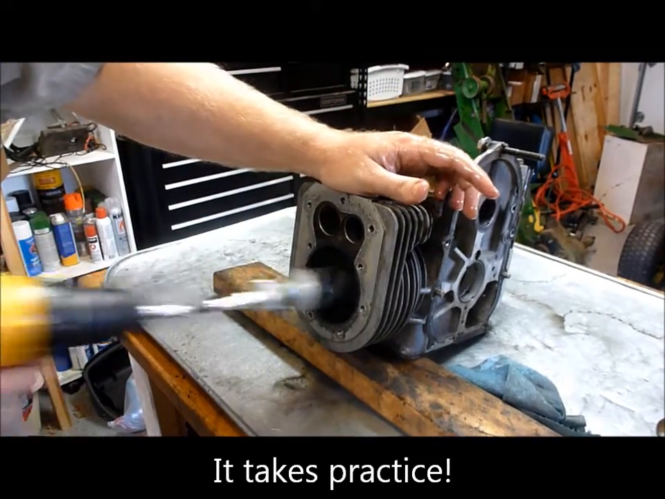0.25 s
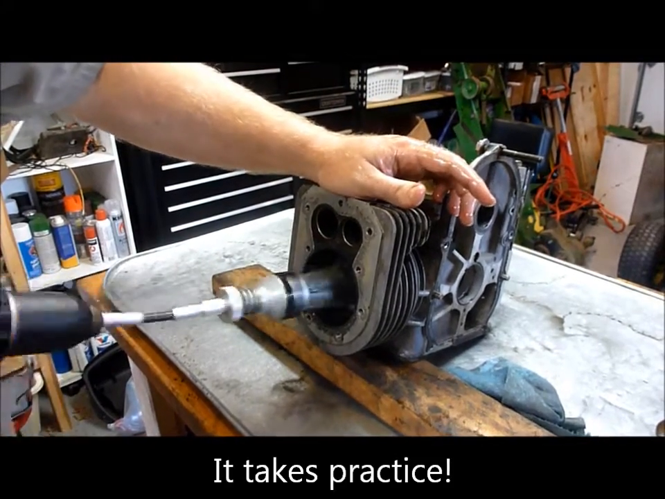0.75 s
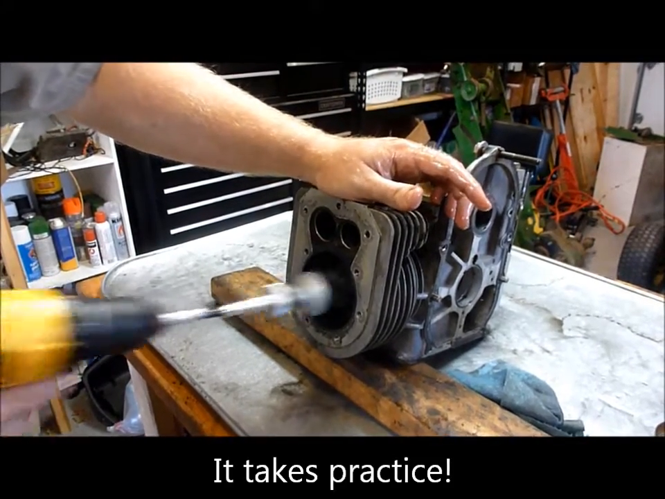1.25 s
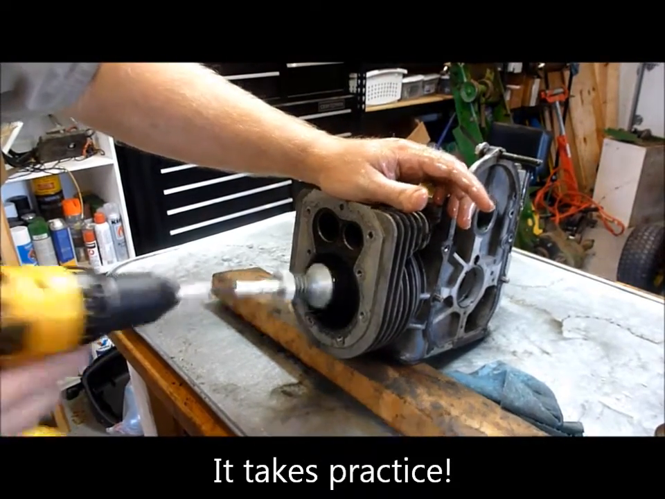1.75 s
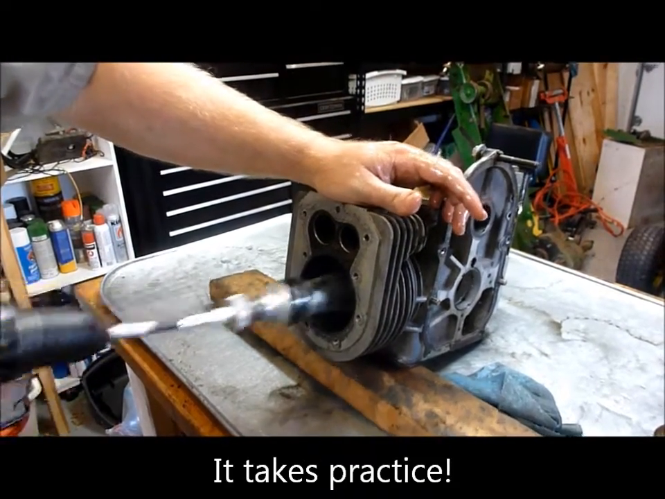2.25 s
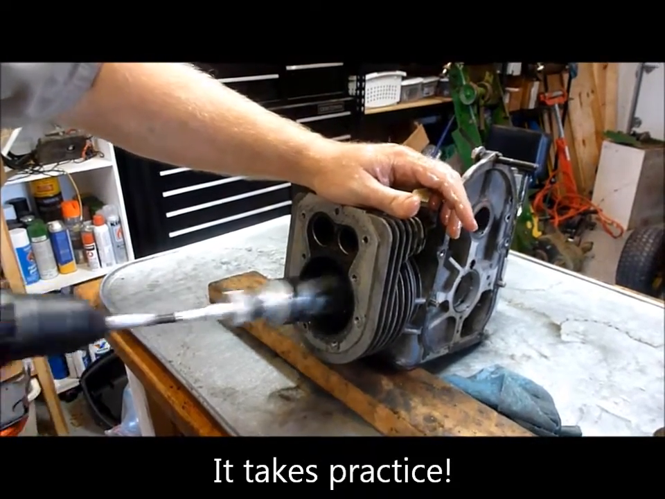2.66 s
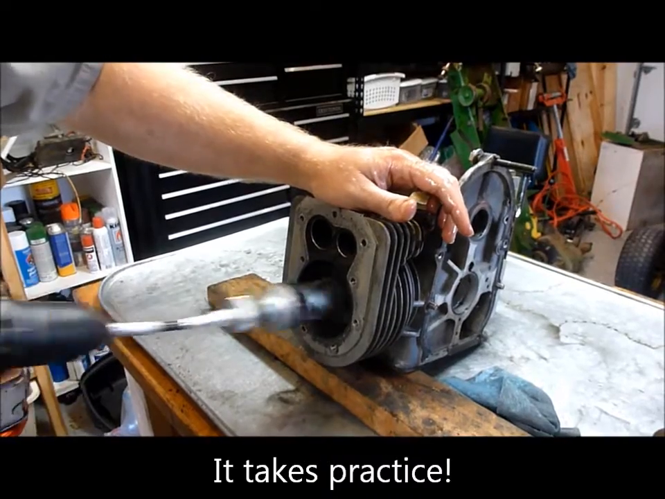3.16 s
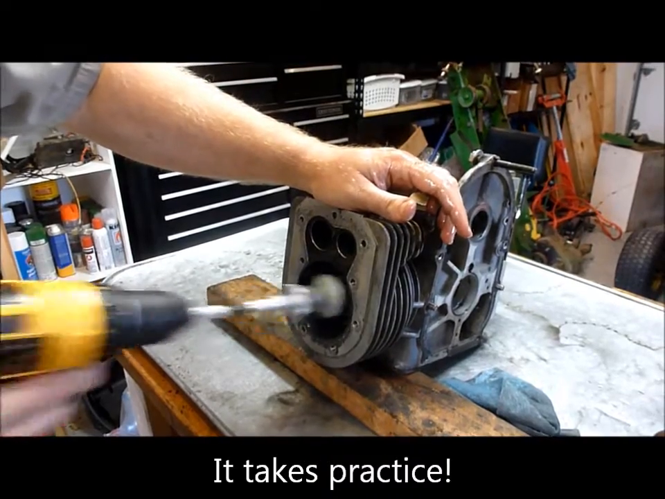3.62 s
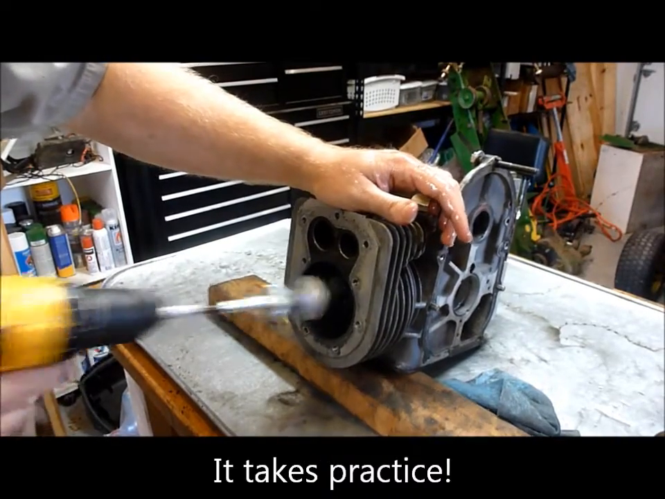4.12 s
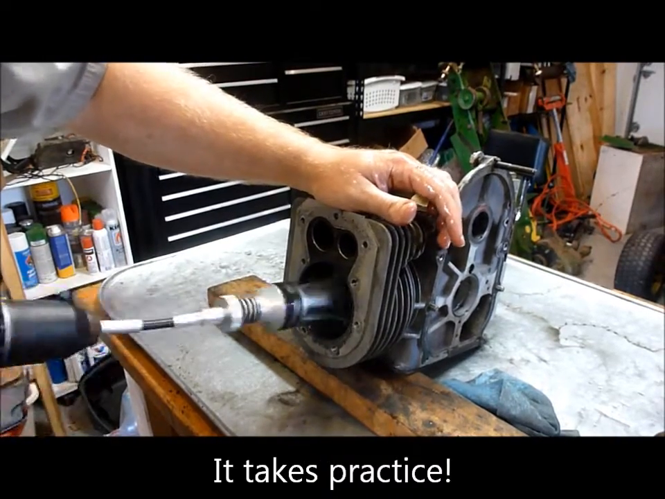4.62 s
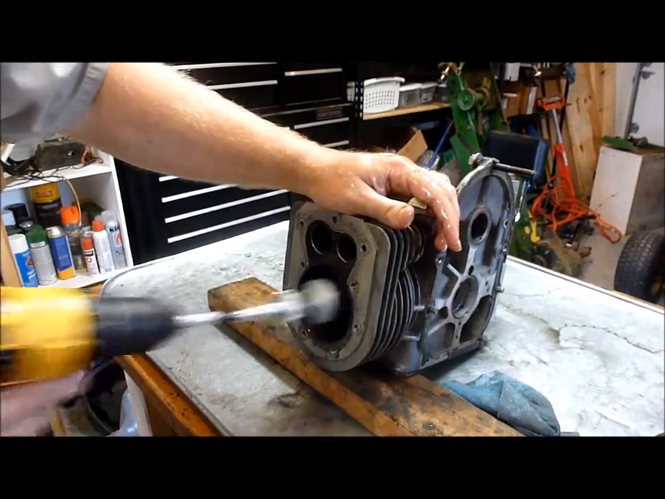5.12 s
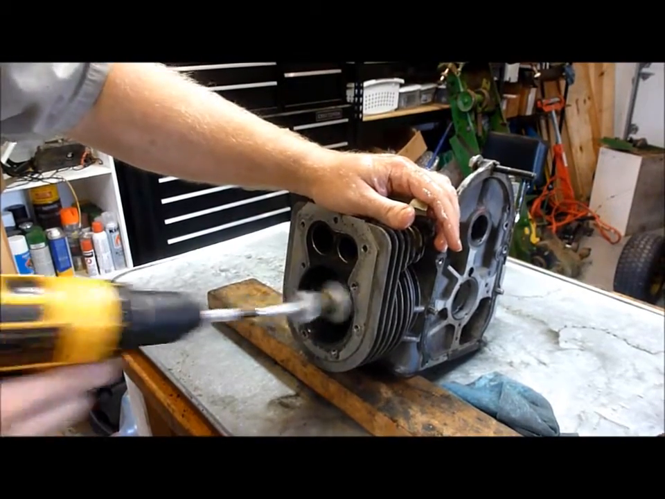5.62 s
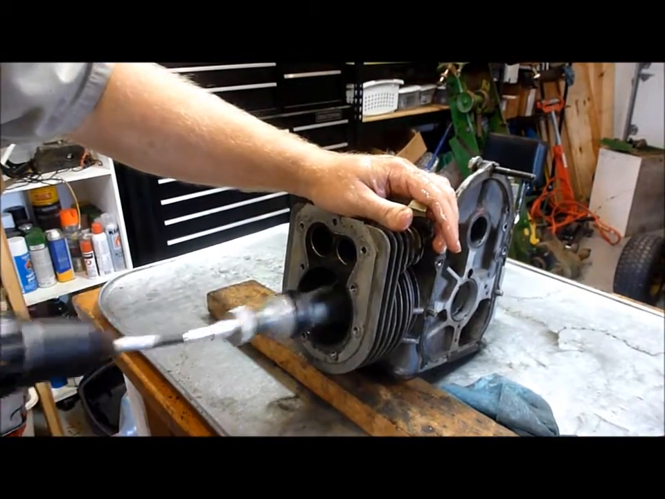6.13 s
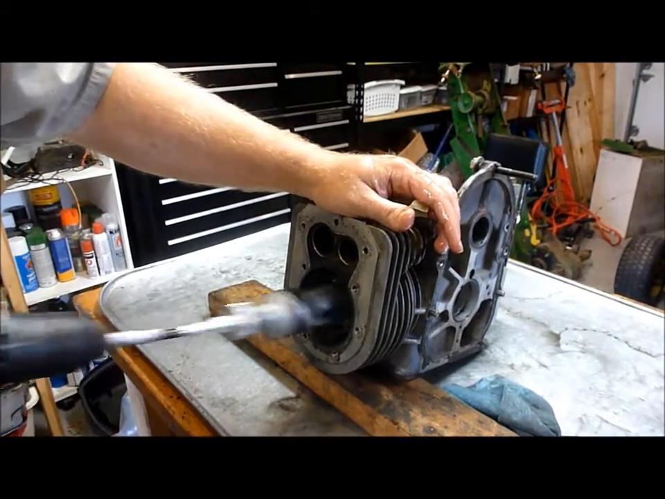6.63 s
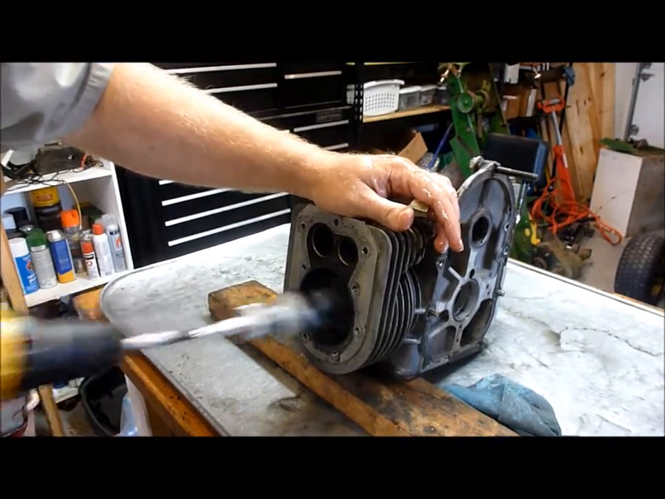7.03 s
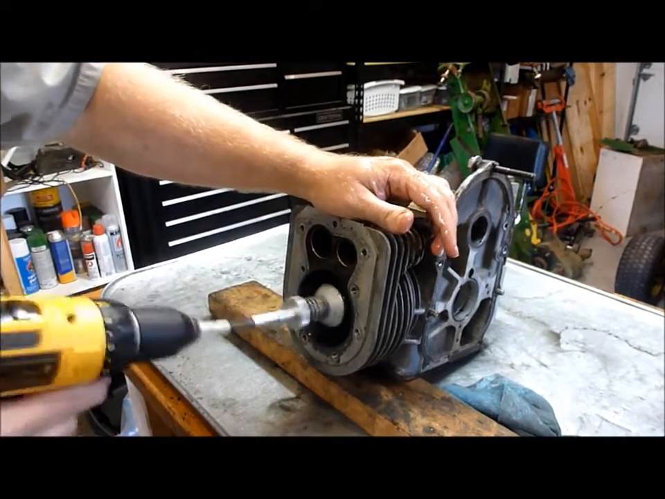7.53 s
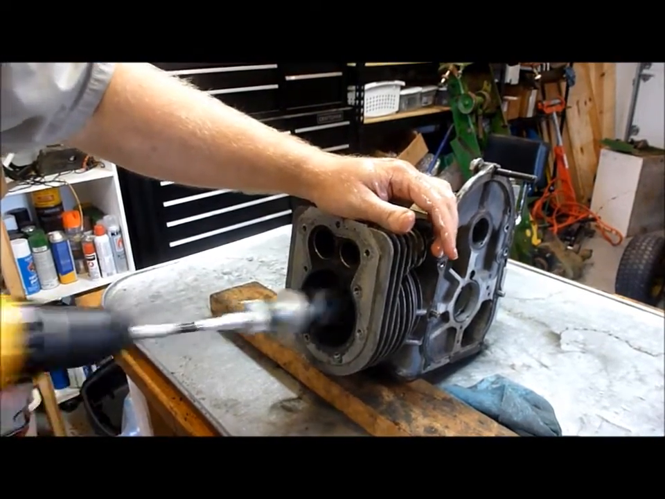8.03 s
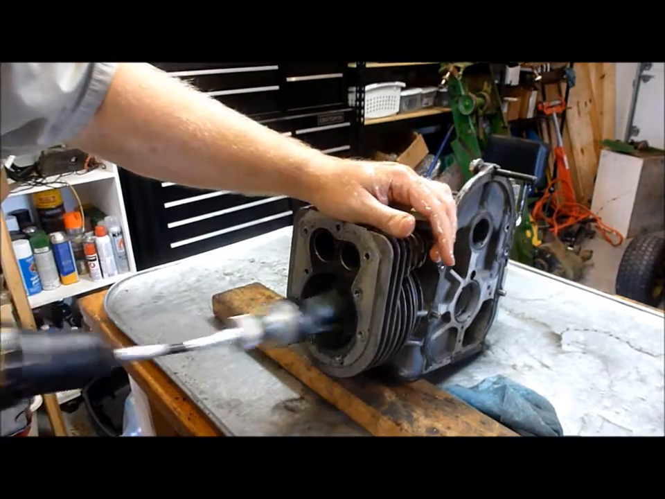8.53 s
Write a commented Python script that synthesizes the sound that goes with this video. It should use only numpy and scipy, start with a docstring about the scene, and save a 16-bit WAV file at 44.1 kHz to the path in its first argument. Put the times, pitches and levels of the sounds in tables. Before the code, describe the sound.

Continuous motor and gear whine with coarse gritty grinding, pulsing in quick regular strokes. Each stroke brings a brighter scrape and small metallic ticks with a short ring, followed by a slight sag in motor pitch and level. Irregular hard snaps, clacking metal and low wooden thuds join from around two seconds and recur to the end. Close microphone, little room, centred and somewhat band-limited.

```python
"""A cordless drill spins a three-stone hone in the bore of a small aluminium engine block, 2.6 strokes a second.
From the start the motor and gears whine as stacked sines, the oiled stones grind as filtered grit impacts,
and the arms and bench ring as damped modes. At each visit to the mouth of the bore the hiss rises and the stones
crack on the rim; shortly after, the motor slows, and whine and grinding mostly dip in level. After a second or so
come harder snaps, then thumps of the block and knocks of the hone (noise bursts, bench modes under the thumps)."""
import sys
import numpy as np
from scipy import signal
from scipy.fft import rfft, irfft
from scipy.io import wavfile
from scipy.ndimage import uniform_filter1d

SR = 44100
rng = np.random.default_rng(int(sys.argv[2]) if len(sys.argv) > 2 else 0)


def int16_out(signal):
    """Quantize to a 16-bit WAV file."""
    q = np.round(np.clip(np.atleast_2d(signal).T, -1, 1) * 32767)
    wavfile.write(sys.argv[1], SR, q.astype(np.int16))


N = 386757
TIME = np.arange(N) / SR

# the drill slowly tires: (time [s], shaft rate between slowings [Hz], whine level between dips [dB],
# grinding level between dips [dB])
DRIVE = [(0, 477.8, -28.5, -28), (0.9, 478.8, -29.5, -28), (1.65, 477.3, -29.5, -27.5),
         (2.05, 475, -30.5, -27), (3.1, 474.6, -30, -29), (4.2, 472.5, -33.5, -29),
         (4.75, 471.5, -32.3, -29), (5.45, 468.3, -33, -30), (6.65, 470, -32.5, -31.5),
         (7.45, 468.2, -34.5, -31), (8.18, 464.9, -32.5, -31), (8.4, 466.5, -33, -31),
         (8.77, 459.8, -30.5, -30)]
# tones of the motor: (multiple of the shaft rate, level [dB])
MOTOR_ORDERS = [(2, -56), (3, -70.5), (4, -40.5), (5, -51.5), (7, -64.5), (9, -44.5), (10, -41.5),
                (13, -52.5), (15, -64)]
# tones of the first gear stage: (multiple of the sun gear's rate against its carrier, level [dB])
GEAR_ORDERS = [(1, -41.5), (2, -41.5), (3, -39), (4, -47.5), (5, -43.5), (6, -38), (7, -46.5), (14, -47.5),
               (17, -63)]
# tones of the second gear stage: (multiple of its tooth rate, level [dB])
MESH_ORDERS = [(1, -47), (2, -37)]
# tones of the slower gears: (multiple of a fifth of the shaft rate, level [dB])
SLOW_ORDERS = [(4, -65), (18, -52.5), (52, -51)]
# spectrum of stone on bore, shared by grind, hiss and cracks: (frequency [Hz], relative level [dB])
STONE_SPECTRUM = [(35, -65), (60, -51), (353, -13.5), (407, -8), (450, -11.5), (764, -11.5), (812, -10),
                  (881, -10), (1270, -6), (1560, -10), (2540, -0.5), (3180, -6), (5280, -3.5), (7320, -30),
                  (7780, -54.5), (10100, -74.5), (17100, -120)]
# tilt added for the grind, then for the hiss: (frequency [Hz], gain [dB])
GRIND_TILT = [(150, 5.5), (340, -5), (700, 3.5), (1250, 1.5), (2100, 2.5), (2700, -2.5), (3300, -6.5), (6000, -16.5)]
HISS_TILT = [(1000, -18.0), (2400, -20), (3200, 1.5), (4600, 2), (5200, 0), (5700, 2.0), (7000, 5.5)]
# modes of the hone's arms and the finned block: (frequency [Hz], relative level [dB], t60 [s])
ARM_MODES = [(1673, -6.5, 0.094), (1981, -4, .15), (2048, -5.5, 0.071), (2435, -9, 0.14), (2797, 3.5, 0.15),
             (2831, 2, 0.11), (3340, -10.5, 0.052), (3620, -6.5, 0.24), (3670, -7, 0.39), (3782, 2.5, 0.2),
             (3880, 3, .22), (3910, -6, 0.11), (4140, -8.5, 0.18), (4360, -9, 0.1), (4586, -3.5, .25),
             (4730, -8, 0.086), (4880, -8.5, .12), (5080, -6, .12), (5430, -5, 0.28), (5650, -8, 0.18),
             (6160, -13, .15), (6430, -13, 0.18), (6560, -13, 0.22), (6840, -16.5, .1)]
# modes of the boards and bench top: (frequency [Hz], relative level [dB], t60 [s])
BENCH_MODES = [(82, -6, .12), (115, -6, .12), (140, 1, .2), (161, 0, .18), (198, 1, .26), (212, 0, .25),
               (236, -2, .18), (268, -3, .12), (318, -6, .1)]
# the hone is drawn back to the mouth of the bore: (arrival time [s], stay [s], crack level [dB],
# rise in hiss before it levels off [dB], ring level of the arms [dB], bench rumble level [dB],
# dip in grinding level shortly after [dB], dip in whine level shortly after [dB])
STROKES = [(0.124, 0.0302, -11, 5.5, -32, -45, 2, 4.5), (0.5023, 0.071, -12.5, 5, -26.5, -44, 3, 10.5),
           (0.9001, 0.077, -11, 0, -25, -48, 2.5, 4.5), (1.3156, 0.057, -14, 5, -29, -47, 3.5, 6),
           (1.6815, 0.018, -11, 4, -34, -41, 6.5, 10), (2.067, 0.021, -19, 6, -45, -31, 7, 11.5),
           (2.4871, 0.082, -15, 5, -31, -48.5, 2.5, 3.5), (2.8456, 0.096, -14.5, 5, -30, -51, 0.5, 3),
           (3.236, .09, -21.5, 6, -33, -48, 3, 3), (3.6236, 0.094, -19, 5.5, -26.5, -47.5, 3, 3.5),
           (3.9832, .03, -16, 4, -30, -46, 1, 10.5), (4.4057, 0.055, -15, 6, -28.5, -50, 2.5, 1.5),
           (4.798, 0.0655, -10.5, 7, -31, -44.5, 2.5, 3), (5.144, 0.0798, -13, 4, -29.5, -43, 2, 3),
           (5.5376, .1, -22, 7, -29.5, -44, 0.5, 4.5), (5.9314, 0.0792, -11.5, 7.5, -30, -44.5, 1.5, 5),
           (6.2868, .11, -12, 4.5, -31, -43, 0, 2), (6.7242, .05, -15, 6, -29.5, -47.5, 0, 3),
           (7.0783, .025, -7, 5, -33, -30.5, 2, 7.5), (7.5091, .07, -20, 7, -28.5, -47, 1.5, 0),
           (7.8472, .08, -15, 3, -28.5, -43, -0.5, 2.5), (8.2291, 0.014, -17, 8.5, -39, -35.5, 6, 5.5)]
# stones that snap hard against the rim: (time [s], crack level [dB], ring level of the arms [dB])
SNAPS = [(1.285, -11, -32), (1.7102, -11, -33), (2.0998, -7, -27), (2.4587, -9, -32), (4.0, -12, -29),
         (7.1078, -7, -28.5), (8.2621, -4.5, -27.5)]
# the block drops on the boards: (time [s], level [dB])
THUMPS = [(1.682, -34), (1.72, -34), (2.086, -26), (2.129, -30.5), (2.188, -32), (3.98, -38.5),
          (4.979, -28.5), (7.103, -30.5), (7.136, -35), (7.176, -35), (7.63, -31.5), (7.859, -39),
          (7.903, -29.5), (8.273, -44)]
# the hone knocks against the block: (time [s], level [dB])
KNOCKS = [(1.691, -16), (2.077, -18.5), (3.983, -20), (7.077, -23.5), (7.086, -20.5), (7.855, -17),
          (8.233, -22), (8.251, -24.5)]

# how each part follows a stay at the mouth: (lag [s], attack [s], release [s])
SCRAPE_SHAPE = (0.0, 0.096, 0.062)
RING_SHAPE = (0.018, 0.03, 0.083)
RUMBLE_SHAPE = (0.03, 0.056, 0.18)
WHINE_DIP_SHAPE = (0.047, 0.052, 0.1)
SLOWING_SHAPE = (0.0493, 0.08, 0.14)
GRIND_DIP_SHAPE = (0.06, 0.04, 0.18)

SLOWING_HZ = 6.2  # the shaft slows as the stones drag at the mouth
HISS_BELOW_GRIND_DB = 3.5  # gritty hiss deep in the bore
HISS_DIP = 0.4  # dB of dip in the hiss per dB of dip in the grinding
RING_REST_DB, RUMBLE_REST_DB = -36, -67.5  # arms and bench while the hone runs deep in the bore
CATCH_EVERY_S = 0.0435  # about one turn of the spindle
CATCH_RING_DB = -25  # ring of the arms after a catch, before any fade
CATCH_FADE_DB_PER_S = 801  # the catches die away as the hone slides back in
TOP_HZ = 7600  # upper edge of the recorder's band


def amp(db):
    """Decibels to gain."""
    return 10 ** (np.asarray(db) / 20)


def unit(x):
    """Scale to rms 1."""
    return x / np.sqrt(np.mean(x ** 2))


def curves(table):
    """Draw each column of a timed table as an automation curve, one value per sample."""
    times, *columns = np.transpose(table)
    return [np.interp(TIME, times, column) for column in columns]


def swells(heights, shape):
    """Attack, hold and release around each stay at the mouth, to one height per stroke."""
    lag, attack, release = shape
    out = np.zeros(N)
    for (arrival, stay, *_), height in zip(STROKES, heights):
        corners = arrival + lag + np.array([-attack, 0, stay, stay + release])
        out += np.interp(TIME, corners, [0, height, height, 0])
    return out


def walk(rate):
    """Smooth random drift of rms 1, with a new target about `rate` times a second."""
    step = max(int(SR / rate), 2)
    targets = rng.standard_normal(N // step + 1)
    return unit(uniform_filter1d(np.repeat(targets, step), step)[:N])


def colour(x, points):
    """Filter by a spectrum of (frequency [Hz], gain [dB]) points."""
    hz, db = np.transpose(points)
    bins_hz = np.maximum(np.arange(len(x) // 2 + 1) * SR / len(x), 1)
    gain = amp(np.interp(np.log(bins_hz), np.log(hz), db))
    return irfft(rfft(x) * gain, len(x))


def band(x, low_hz, high_hz, order=2):
    """Band-pass."""
    edges = [low_hz, min(high_hz, 0.45 * SR)]
    return signal.sosfilt(signal.butter(order, edges, "band", fs=SR, output="sos"), x)


def fade(t60):
    """Half a second of exponential decay that falls 60 dB in t60 seconds."""
    return np.exp(-np.log(1000) * TIME[:SR // 2] / t60)


def ring(modes):
    """One blow on a set of damped modes; chance shifts their levels, pitches and signs a little each time."""
    out = np.zeros(SR // 2)
    for hz, db, t60 in modes:
        size, shift, sign = rng.standard_normal(3)
        wave = np.sin(2 * np.pi * hz * (1 + 0.0017 * shift) * TIME[:SR // 2])
        out += np.sign(sign) * amp(db + 0.27 * size) * fade(t60) * wave
    return out


def grains(rate, spread_db):
    """Random tiny impacts, `rate` a second on average, some larger than the rest."""
    size = amp(spread_db * np.minimum(rng.exponential(size=N), 4))
    struck = rng.random(N) < rate / SR
    return struck * rng.standard_normal(N) * size


def shake(force, modes, size):
    """A rattling force rings a set of modes; its size is read early, as the ringing needs time to build."""
    response = ring(modes)
    lead = int(0.0017 * SR)
    sized = signal.fftconvolve(force * np.roll(size, -lead), response)[:N]
    return sized / np.std(signal.fftconvolve(force, response)[:N])


def burst(low_hz, high_hz, t60, tail_db, tail_t60):
    """The crack of a contact: crowded modes, as noise, that die at once and leave a faint tail."""
    envelope = fade(t60) + amp(tail_db) * fade(tail_t60)
    x = band(rng.standard_normal(SR // 2) * envelope, low_hz, high_hz, order=3)
    return x / np.abs(x).max()


def play(events, blow):
    """A fresh blow for each row, which starts with its time."""
    out = np.zeros(N + SR)
    for time, *strength in events:
        x, start = blow(*strength), int(time * SR)
        out[start:start + len(x)] += x
    return out[:N]


def tones(turns, orders, flutter_db, flutter_rate):
    """Multiples of a rotation, each fluttering as the load shifts among the teeth."""
    out = np.zeros(N)
    for order, db in orders:
        level = amp(db + flutter_db * walk(flutter_rate))
        out += level * np.sin(2 * np.pi * (order * turns + rng.random()))
    return np.sqrt(2) * out


def drill(turns, whine_db):
    """Motor and planetary gears: sines at multiples of each rotation, all following the whine's level curve."""
    sun = turns * 7 / 8
    mesh = turns * 30 / 11
    slow = turns / 5
    backlash = 0.005 * walk(60)  # the gears wander a little against the shaft
    swell_db = whine_db - whine_db.mean()
    whine = amp(whine_db - 1.06) * tones(turns, [(11, 0.012)], flutter_db=2.0, flutter_rate=32)
    motor = tones(turns, MOTOR_ORDERS, flutter_db=2.5, flutter_rate=35)
    hum = tones(sun, GEAR_ORDERS[:1], flutter_db=0.6, flutter_rate=12)
    gears = tones(sun + backlash, GEAR_ORDERS[1:], flutter_db=2.0, flutter_rate=25)
    slow_gears = tones(slow, SLOW_ORDERS, flutter_db=6.5, flutter_rate=27)
    # the second stage rasps: its teeth take up the load in short uneven spells
    rasp = unit(amp(2.5 * np.sin(2 * np.pi * slow) + 2.5 * walk(130)))
    teeth = rasp * tones(mesh + 0.019 * walk(110), MESH_ORDERS, flutter_db=1.5, flutter_rate=50)
    # each part follows the whine's swell to its own degree
    hum = amp(0.7 * swell_db) * hum
    body = amp(0.69 * swell_db) * (motor + gears + slow_gears)
    teeth = amp(1.5 * swell_db) * teeth
    return whine + hum + body + teeth


def stones(turns, grind_db, hiss_db):
    """Grit tears at the wall, pressed harder as the spindle turns; the hiss buzzes at the motor's rate."""
    spindle = 2 * np.pi * turns / 20
    wobble = amp(0.41 * np.sin(spindle + walk(2.9)))
    ripple = amp(0.65 * np.sin(4 * spindle + walk(15)))
    grind = colour(grains(rate=9000, spread_db=1.4) * wobble, STONE_SPECTRUM)
    grind = unit(colour(grind, GRIND_TILT))
    buzz = amp(0.43 * np.sin(2 * np.pi * turns))
    hiss = colour(grains(rate=7000, spread_db=0.6) * buzz, STONE_SPECTRUM)
    hiss = unit(colour(hiss, HISS_TILT))
    # a stone that skips rubs less, so the hiss levels off on the hardest scrapes
    rubbing_db = hiss_db - 0.35 * np.maximum(hiss_db + 32, 0)
    return ripple * (grind * amp(grind_db + 1.0) + hiss * amp(rubbing_db + 1.5))


def chatter(ring_db):
    """Three stones skip on the wall and keep their arms ringing; the skipping gives way at low levels."""
    skipping = 1 / (1 + np.exp(-(ring_db + 37) / 2.2))
    size = amp(ring_db - 3.0) * skipping
    out = np.zeros(N)
    for _ in range(3):
        skips = grains(rate=490, spread_db=2.0) * amp(2 * walk(40))
        out += shake(skips, ARM_MODES, size)
    return out


def bench(rumble_db):
    """The block shuffles on its boards, and the bench top rumbles."""
    shuffle = grains(rate=1400, spread_db=2.1)
    return band(shake(shuffle, BENCH_MODES, amp(rumble_db - 3.0)), 50, 660)


def catches(count):
    """At the mouth a stone catches the rim at even intervals, fading once the hone goes back in."""
    rows = []
    for arrival, stay, crack_db, *_ in STROKES:
        for after in CATCH_EVERY_S * np.arange(count):
            loss_db = CATCH_FADE_DB_PER_S * max(after - stay, 0)
            rows.append((arrival + after, crack_db - loss_db, CATCH_RING_DB - loss_db))
    return rows


def tap(crack_db, ring_db):
    """Stone on rim: a short gritty crack, and the arms ring on."""
    crack = colour(burst(2600, 12000, t60=0.021, tail_db=-24.0, tail_t60=0.15), STONE_SPECTRUM)
    crack = crack / np.abs(crack).max()
    arms = ring(ARM_MODES)
    arms = arms / np.abs(arms).max()
    return amp(crack_db - 1.5) * crack + amp(ring_db + 12.5) * arms


def thump(level_db):
    """The block drops back on the boards and the bench booms."""
    boom = amp(-13.0) * ring(BENCH_MODES)
    thud = amp(2.0) * burst(65, 280, t60=0.05, tail_db=-13, tail_t60=0.58)
    return amp(level_db) * band(boom + thud, 50, 370)


def knock(level_db):
    """The hone's head hits the casting: a hollow clack with a metallic edge."""
    clack = amp(1.5) * burst(455, 1300, t60=0.053, tail_db=-13.0, tail_t60=0.2)
    edge = amp(0.5) * burst(1500, 4600, t60=0.022, tail_db=-29, tail_t60=0.1)
    return amp(level_db) * (clack + edge)


def scene():
    """At the mouth the hone scrapes; then the motor slows, and the whine and grinding mostly dip in level."""
    free_hz, whine_db, grind_db = curves(DRIVE)
    *_, scrapes_db, rings_db, rumbles_db, grind_dips_db, whine_dips_db = np.transpose(STROKES)
    shaft_hz = free_hz - swells([SLOWING_HZ] * len(STROKES), SLOWING_SHAPE)
    turns = np.cumsum(shaft_hz) / SR
    whine_db = whine_db - swells(whine_dips_db, WHINE_DIP_SHAPE)
    grind_dip_db = swells(grind_dips_db, GRIND_DIP_SHAPE)
    deep_hiss_db = grind_db - HISS_BELOW_GRIND_DB - HISS_DIP * grind_dip_db
    hiss_db = deep_hiss_db + swells(scrapes_db, SCRAPE_SHAPE)
    ring_db = RING_REST_DB + swells(rings_db - RING_REST_DB, RING_SHAPE)
    rumble_db = RUMBLE_REST_DB + swells(rumbles_db - RUMBLE_REST_DB, RUMBLE_SHAPE)
    running = drill(turns, whine_db) + stones(turns, grind_db - grind_dip_db, hiss_db)
    running = running + chatter(ring_db) + bench(rumble_db)
    blows = play(catches(count=3) + SNAPS, tap) + play(THUMPS, thump) + play(KNOCKS, knock)
    sound = running + blows
    return np.array([sound, sound])  # the same in both channels


def record(dry):
    """A recorder with a narrow band: a steep low-pass takes off the top."""
    return signal.sosfilt(signal.ellip(10, 0.2, 70, TOP_HZ, fs=SR, output="sos"), dry)


dry = scene()
out = record(dry)
int16_out(out)
```